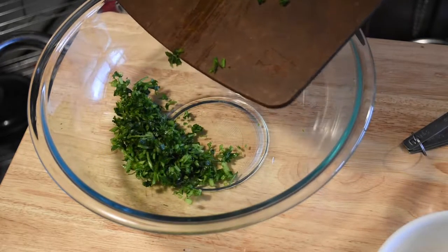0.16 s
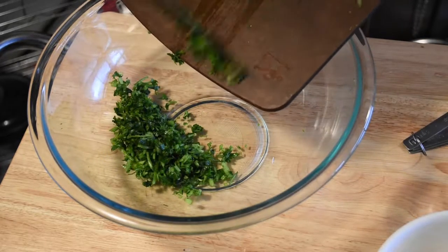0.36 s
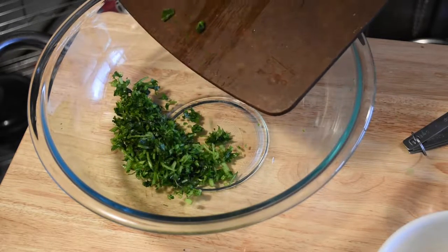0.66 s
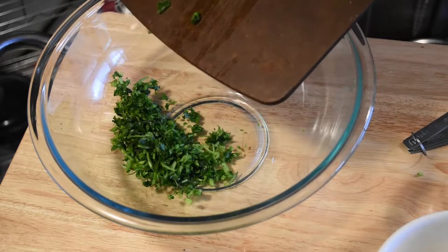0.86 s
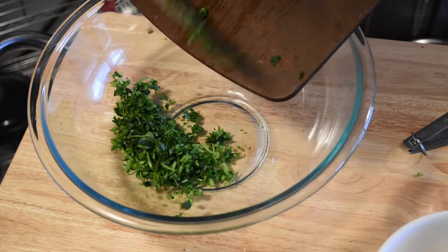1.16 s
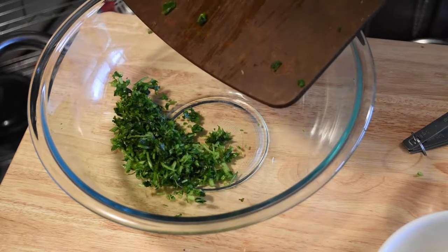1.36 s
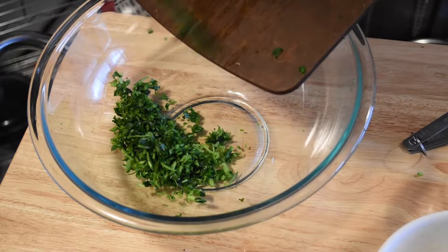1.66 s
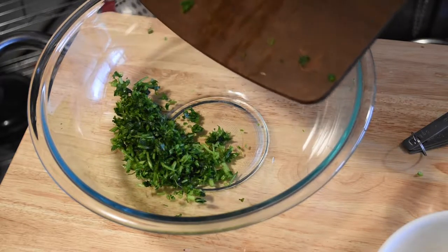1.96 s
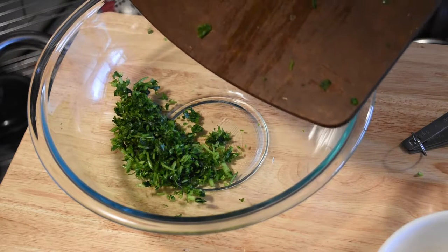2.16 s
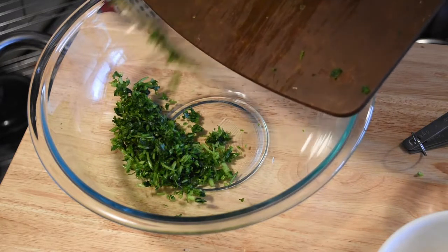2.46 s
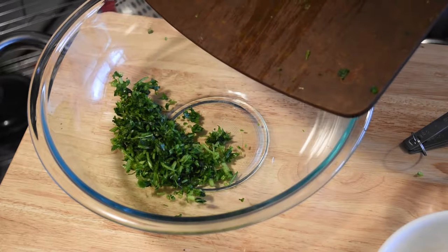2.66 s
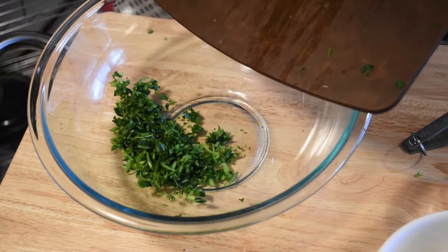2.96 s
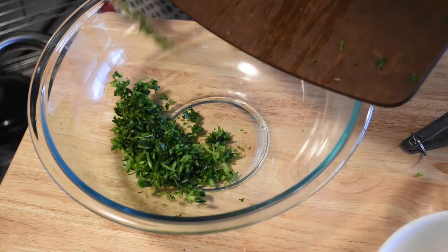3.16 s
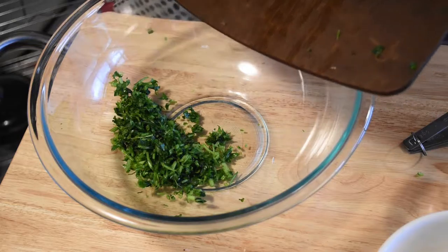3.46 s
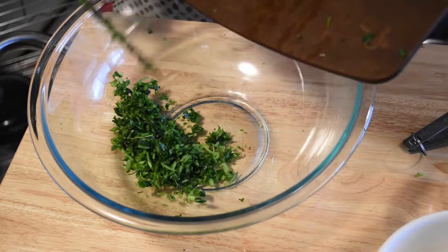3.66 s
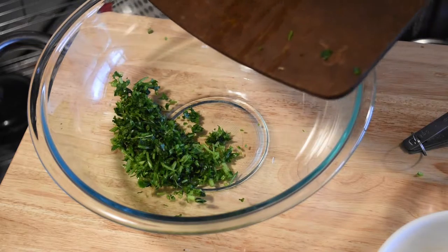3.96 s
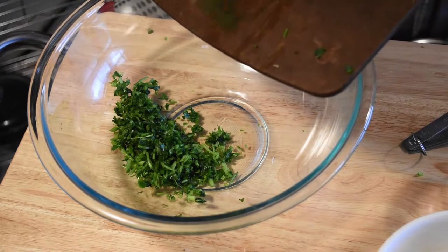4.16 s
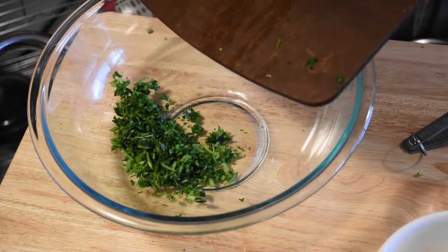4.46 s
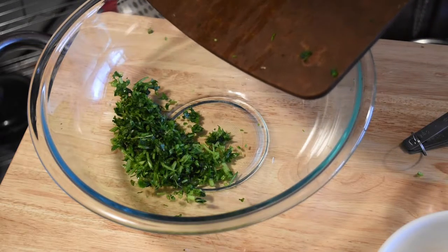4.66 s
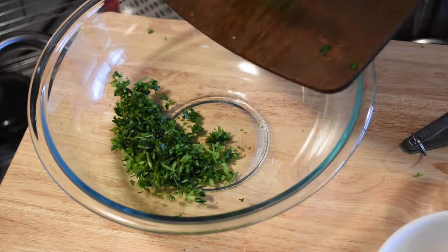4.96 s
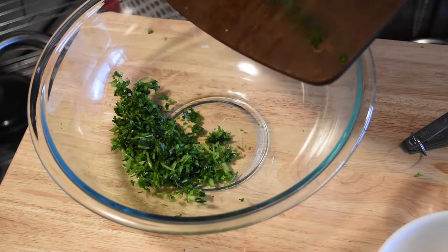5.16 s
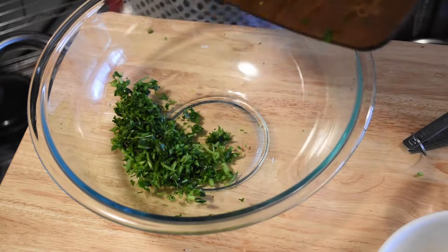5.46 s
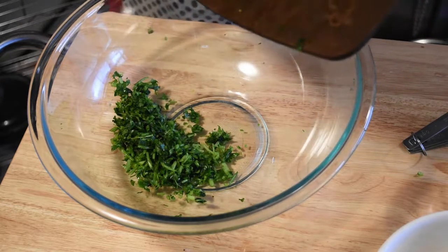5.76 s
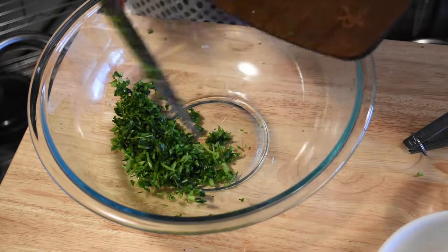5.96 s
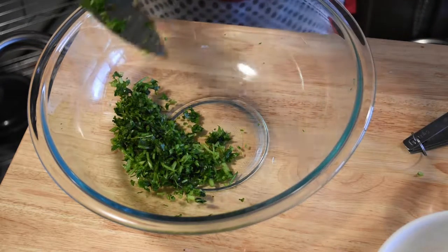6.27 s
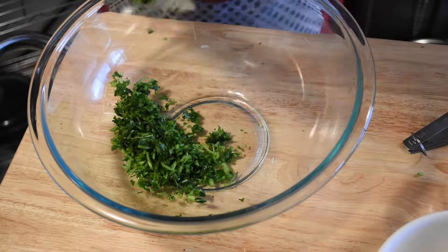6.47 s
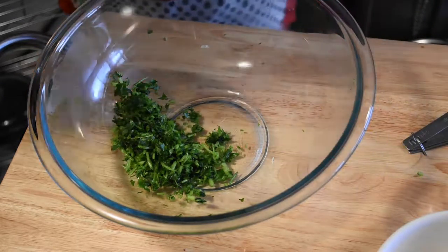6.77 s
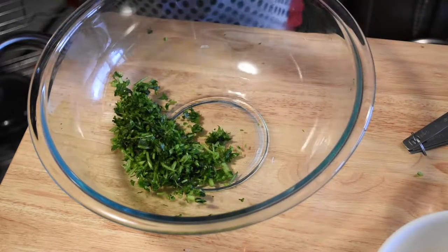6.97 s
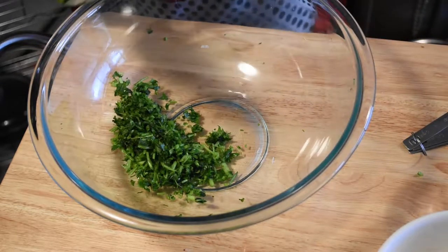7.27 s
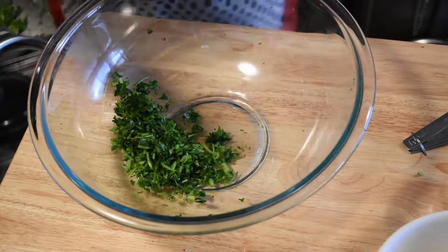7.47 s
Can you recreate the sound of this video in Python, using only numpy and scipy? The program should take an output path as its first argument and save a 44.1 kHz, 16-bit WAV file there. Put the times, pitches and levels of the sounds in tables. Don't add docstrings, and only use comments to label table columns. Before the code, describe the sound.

A small, hard-surfaced kitchen has a constant airy appliance hiss, a thin whistling fan tone and slight hum. At once a hand-held wooden board gives a short creak, and a knife clacks onto it at 0.05 s, followed by light scrapes until 0.4. Strong knocks at 0.67 and 0.83 with a low thud lead into bright double scrapes around 1.0. Another hard clack at 1.5 starts a long swelling drag and a quick rasp to 1.75. Similar knock-and-scrape groups come at 2.27-2.5, 2.9-3.1, a very sharp hit at 3.5, then 4.05-4.25 with a firm thud, 4.57-4.85, 5.17 and a lighter 5.8-5.9. Wood sounds hollow and mid-pitched, steel rings briefly, grit and torn herbs add crisp treble. Small ticks follow at 6.06-6.25 and 7.2-7.4, with faint crackly rustling from 6.6 to the end. Close stereo, short bright reverberation.

```python
import sys
import numpy as np
from scipy import signal
from scipy.fft import rfft, irfft, next_fast_len
from scipy.io import wavfile
from scipy.ndimage import uniform_filter1d

SR = 44100
rng = np.random.default_rng(int(sys.argv[2]) if len(sys.argv) > 2 else 0)


def transcribe(signal):
    frames = np.atleast_2d(signal).T
    limited = np.clip(frames, -1, 1)
    pcm = np.round(limited * 32767).astype(np.int16)
    wavfile.write(sys.argv[1], SR, pcm)


def volts_from_decibels(level):
    exponent = np.asarray(level, float) / 20
    return 10 ** exponent


N = 335601


def band(x, lo_hz, hi_hz, order=2):
    return signal.sosfilt(signal.butter(order, [lo_hz, hi_hz], "bandpass", fs=SR, output="sos"), x)


def shape(x, table):
    hz, db = np.transpose(table)
    size = next_fast_len(x.shape[-1])
    log_f = np.log(np.fft.rfftfreq(size, 1 / SR) + 1)
    gain = volts_from_decibels(np.interp(log_f, np.log(hz), db))
    return irfft(rfft(x, size) * gain, size)[..., :x.shape[-1]]


def unit(x):
    return x / np.sqrt(np.mean(x ** 2))


def walk(rate):
    hold = int(SR / rate)
    steps = np.repeat(rng.standard_normal(N // hold + 1), hold)
    return 2.0 * uniform_filter1d(steps, hold)[:N]


# (frequency [Hz], density [dB per Hz])
AIR = [(15, -43), (25, -15), (335, 0), (416, -2), (575, -5.5), (714, -5.5), (2350, -16.5), (2690, -7),
       (3520, -11), (4030, -17.5), (10100, -24.5), (14800, -31), (16000, -26.5)]
# (low edge [Hz], high edge [Hz], level [dB])
WHISTLE = [
    (2520, 3110, -67),
    (3316, 3580, -62),
    (3590, 3900, -65.5),
    (4325, 4580, -72.5),
    (6200, 6550, -72),
    (340, 460, -66.5),
    (93, 110, -68.5),
]
# (frequency [Hz], level [dB], 12 below its peak)
WHINE = [(15665, -80.5)]


def appliances():
    mid, side = rng.standard_normal((2, N))
    side = shape(side, [(100, -24), (500, -21.5), (1500, -6.5), (4000, -2), (12000, -0.5)])
    pair = np.array([mid + side, mid - side])
    out = volts_from_decibels(-53.5 + 0.7 * walk(3.)) * unit(shape(pair, AIR))
    for lo_hz, hi_hz, db in WHISTLE:
        out += volts_from_decibels(db + 1.5 * walk(5.5)) * unit(band(pair, lo_hz, hi_hz, order=3))
    for hz, db in WHINE:
        out += volts_from_decibels(db + 12.0) * np.sin(2 * np.pi * hz * np.arange(N) / SR)
    return out * volts_from_decibels(np.array([[1.3], [-1.3]]))


def taps(events, cycles):
    out = np.zeros(N)
    for s, db, hz in events:
        turn = np.arange(int(6 * cycles * SR / hz)) * hz / SR
        swing = volts_from_decibels(db) * np.sin(2 * np.pi * turn) * np.exp(-turn / cycles)
        i = int(s * SR)
        out[i:i + len(turn)] += swing[:N - i]
    return out


# (time [s], peak level [dB], frequency [Hz])
GRIP = [
    (0.0011, -31, 395),
    (0.02, -30.5, 350),
    (0.0039, -52, 1565),
]


def grip():
    return taps(GRIP[:2], 5.4) + taps(GRIP[2:], 45.)


# (time [s], board level [dB], knock level re board [dB],
# blade level re board [dB], rattle length [s])
BLOWS = [(0.044, -13, -15, 1, 0.0022), (0.674, -16, -8.5, -0.5, 0.0056), (0.765, -27, -12, -10, 0.0038),
         (0.8349, -14.5, -11, -5, 0.0034), (1.481, -12, -16.5, -13.5, 0.004),
         (2.2664, -14, -48, -4.5, 0.0016), (2.9072, -22, -8, -12, 0.0014), (2.94, -37, -6, -11, 0.0041),
         (3.4959, -9.5, -22.5, -13.5, 0.0025), (4.0525, -20, -18, 11.5, 0.00097),
         (4.206, -21.5, -40, 3, 0.0087), (4.572, -18, -11.5, -12, 0.003), (5.171, -20, -19, 13, 0.0013),
         (5.7755, -28, -30, 19.5, 0.0015), (5.862, -32, -32.5, 11.5, .003), (1.698, -29, -32, 6, .004)]


def blows():
    size = 1500
    force = np.zeros((5, N))
    chatter = rng.standard_normal((len(BLOWS), size))
    for (s, db, knock_db, blade_db, length), noise in zip(BLOWS, chatter):
        i = int(s * SR)
        burst = np.tanh(noise) * np.exp(-np.arange(size) / SR / max(length, 2e-4))
        burst[:2] = -4.5
        burst *= np.sqrt(SR / 100 / np.sum(burst ** 2))
        contact_s = 0.00036 * volts_from_decibels(-0.27 * blade_db)
        push = np.hanning(int(contact_s * SR) + 3)
        soft = np.convolve(burst, push / push.sum())[:size]
        grit_db = -11 + 1.22 * blade_db
        fibres_db = -28 + 0.8 * blade_db
        gains = volts_from_decibels(db + np.array([knock_db, 0, blade_db, grit_db, fibres_db]))
        force[:, i:i + size] += gains[:, None] * np.array([soft, soft, burst, burst, burst])
    return force


# (low edge [Hz], high edge [Hz], level [dB])
CRACK = [
    (163, 840, -2.5),
    (407, 1064, -6.5),
    (1420, 3600, -4.5),
    (3440, 9740, 0.5),
    (8000, 12000, 5.5),
]


def crack(hits):
    out = 0
    for hit, (lo_hz, hi_hz, db) in zip(hits, CRACK):
        out = out + volts_from_decibels(db) * band(hit, lo_hz, hi_hz, order=3) * np.sqrt(SR / 2 / (hi_hz - lo_hz))
    return out


ATTACK_S = 0.0091
LIFT_DB_PER_S = [414, 388, 380, 600]


def gesture(s, length, start_db, rise_db, lift_db_per_s):
    i = max(int(s * SR), 0)
    t = np.arange(min(SR // 2, N - i)) / SR
    length = max(length, 1e-3)
    tilt_db = np.outer(rise_db, np.minimum(t / length, 1))
    fade_db = np.outer(lift_db_per_s, np.maximum(t - length, 0))
    db = np.array(start_db)[:, None] + tilt_db - fade_db
    power = np.zeros((4, N))
    power[:, i:i + len(t)] = (volts_from_decibels(db) * np.minimum(t / ATTACK_S, 1)) ** 2
    return power


# (time [s], board level [dB], blade level re board [dB],
# grit level re board [dB], fade [dB per s])
SETTLES = [(.045, -25, 1.5, -2.5, 167), (0.672, -18, 1, -9.5, 381), (0.761, -31, -3.5, -22, 330),
           (0.835, -17.5, -6, -32.5, 381.5), (1.481, -19, -9.5, -18, 402.5),
           (2.267, -23, 4.5, -10.5, 170.5), (2.908, -27.5, -6, -18, 300), (3.496, -20, 3, -5, 251),
           (4.052, -28, -1, 2.5, 304.5), (4.571, -22, -18, -23.5, 251.5), (5.171, -32, 4, 2.5, 398.5),
           (5.776, -35, 6.5, 7, 399.5)]


def settles():
    power = np.zeros((4, N))
    for s, db, blade, grit, fade in SETTLES:
        parts = np.array([0, blade, grit, grit - 20])
        power += gesture(s, ATTACK_S, db + parts, np.zeros(4), np.full(4, fade))
    return power


# (time [s], length [s], board level [dB], blade level re board [dB], fibres level re board [dB])
PUSHES = [(0.06, 0.022, -27.5, 8, -25), (0.165, 0.038, -24, -7, -7), (.36, 0.044, -32, -1, -9.5),
          (0.961, 0.038, -22.5, 9.5, -1.5), (1.02, 0.094, -24, 10.5, -2), (1.687, 0.059, -23, 11, -2.5),
          (2.306, 0.039, -26.5, -4.5, -13.5), (2.429, 0.085, -21, 7, -7), (2.932, 0.033, -26.5, 3.5, -7),
          (3.062, 0.057, -25, 7, -5.5), (3.529, .03, -24.5, 8.5, -1), (3.584, 0.019, -36.5, 8, 1),
          (4.077, 0.046, -26, 7, -19), (4.187, 0.032, -23.5, 8, -6), (4.231, 0.025, -26, 9.5, -4.5),
          (4.729, 0.071, -23.5, 11.5, -6), (4.807, 0.043, -31.5, 6.5, -4.5), (5.194, 0.051, -26, 4.5, -10),
          (5.228, 0.026, -25, 3.5, -7), (5.805, 0.056, -26, 8.5, -10), (5.85, 0.053, -26.5, 5.5, -4)]
PUSH_RISE_DB = [-4.5, -1.9, 1.5, -3]


def pushes():
    power = np.zeros((4, N))
    rise = np.array(PUSH_RISE_DB)
    for s, length, db, blade, fibres in PUSHES:
        parts = np.array([0, blade, blade - 7, fibres])
        power += gesture(s, length, db + parts - rise / 2, rise, LIFT_DB_PER_S)
    return power


# (time [s], length [s], final board level [dB], blade level re board [dB], swell [dB])
DRAGS = [
    (.11, 0.051, -31.5, -1, -3),
    (.245, 0.15, -33.5, -0.5, 5.5),
    (.893, 0.081, -24, 3, 5),
    (1.545, 0.21, -25.5, -2.5, 8),
    (2.37, .066, -24.5, -5.5, 12),
    (2.985, 0.075, -22.5, -3, 5),
    (4.62, 0.11, -20.5, -0.5, 10),
    (4.134, 0.057, -22.5, -3, 4),
]


def drags():
    power = np.zeros((4, N))
    for s, length, db, blade, swell in DRAGS:
        parts = np.array([0, blade, blade - 7.5, blade - 8])
        power += gesture(s, length, db - swell + parts, np.full(4, swell), LIFT_DB_PER_S)
    return power


def slips(rate, spread_db, flutter_db):
    size = volts_from_decibels(spread_db * np.minimum(rng.exponential(size=N), 3.5))
    happens = rng.random(N) < rate / SR
    jerks = happens * np.tanh(rng.standard_normal(N)) * size
    return unit(jerks * volts_from_decibels(flutter_db * walk(70.)))


def held(table):
    glide_s = 0.011
    s, hz = np.transpose(table)
    now = np.searchsorted(s, np.arange(N) / SR + glide_s / 2, "right") - 1
    return uniform_filter1d(hz[np.maximum(now, 0)], int(glide_s * SR))


def ring(force, modes, wander_db, rate, focus_hz=None, away_db=0.):
    out, power = 0, 0
    for k, (hz, width, db) in enumerate(modes):
        r = np.exp(-np.pi * width / SR)
        poles = [1, -2 * r * np.cos(2 * np.pi * hz / SR), r * r]
        fed_db = db + wander_db * walk(rate)
        if focus_hz is not None:
            octaves = np.log2(hz / focus_hz)
            fed_db += 7.46 * np.exp(-(octaves / 0.06) ** 2) - 1.8
            fed_db -= away_db * (np.minimum(abs(octaves), 1.3) - .6)
        mode = signal.lfilter([1 - r, 0, r * (r - 1)], poles, force * volts_from_decibels(fed_db))
        out = out + (-1) ** k * mode
        power += volts_from_decibels(db) ** 2 * np.pi * width / SR
    return out / np.sqrt(power)


# (frequency [Hz], width [Hz], level [dB])
BOARD_MODES = [(303.8, 35, -15.5), (362, 67, -3.5), (488.6, 25, -1.5), (555, 49, 0), (725, 270, -15),
               (463, 50, -12.5), (826.3, 32, -2.5), (940, 60, 0.5), (997, 100, -0.5), (1260.6, 19, 2.5),
               (820, 1200, -13)]
# (time [s], frequency [Hz])
SPOT = [(0.0, 796), (.06, 520), (.17, 965), (.25, 572), (.83, 820), (.97, 570), (1.03, 720), (1.13, 1000),
        (1.47, 496), (1.54, 400), (1.69, 1002), (1.73, 1260), (2.26, 836), (2.31, 570), (2.465, 875),
        (2.9, 400), (2.93, 1010), (2.99, 575), (3.1, 950), (3.49, 600), (3.57, 840), (4.14, 351),
        (4.18, 578), (4.56, 441), (4.66, 600), (4.8, 903), (5.19, 310), (5.235, 470), (5.77, 1010),
        (5.8, 310)]


def board(force):
    return band(ring(force, BOARD_MODES, 1.5, 22., held(SPOT), away_db=3.0), 267.0, 1900.0, order=3)


# (frequency [Hz], width [Hz], level [dB])
BLADE_MODES = [(1498, 36, -6), (1700.6, 35, -5.5), (1794, 15, -13), (1949, 31, -6), (2143, 66, -6),
               (2361, 44.3, -6.5), (2626, 87, -6), (2717, 97, -7.5), (2999, 37, -2), (3250, 110, -8),
               (3390, 90, -12.5), (2170, 1510, -17.5)]
# (time [s], frequency [Hz])
BITE = [(0.0, 1650), (.67, 2980), (.71, 1980), (.83, 1500), (.9, 2320), (.97, 1722), (1.13, 2430),
        (1.47, 1500), (1.54, 1700), (1.69, 2360), (1.73, 1887), (2.26, 1700), (2.31, 2350), (2.43, 2800),
        (2.465, 1730), (2.9, 1500), (2.99, 2140), (3.09, 1620), (3.49, 1500), (3.52, 2300), (3.57, 1710),
        (4.04, 2430), (4.075, 3020), (4.18, 1950), (4.23, 1550), (4.56, 2370), (4.7, 1725), (5.16, 3200),
        (5.235, 1960), (5.77, 2834)]


def blade(force):
    return band(ring(force, BLADE_MODES, 1.4, 24.813, held(BITE), away_db=3.0), 1100.0, 3300.0)


# (frequency [Hz], width [Hz], level [dB])
GRIT = [(3602, 80, 2), (4016, 144, 1.5), (4510, 350, -2.5), (4944, 180, -1.5), (5300, 390, -4),
        (6000, 1350, -6), (7230, 1020, -5.5), (7780, 290, -5)]
# (frequency [Hz], width [Hz], level [dB])
AIRY = [(8670, 790, 8.5), (9940, 780, 5.5), (10020, 200, 12), (10700, 1300, -0.5), (11940, 110, 7.5),
        (12340, 1400, -7.5), (14570, 1500, -17.5), (13560, 160, -2.5), (15730, 120, -9.5)]


def grit_and_fibres(grit_force, fibres_force):
    top = ring(grit_force, GRIT, 2.1, 40.) + ring(fibres_force, AIRY, 1.66, 40.)
    return band(top, 3000., 15500.)


def knife():
    wood, steel, edge = slips(2500., 1.5, 0.28), slips(4000., 3.8, 0.9), slips(5000., 2.8, 1.1)
    pressure = np.sqrt(settles() + pushes() + drags())
    hits = blows()
    force = pressure * np.array([wood, steel, edge, edge]) + volts_from_decibels(-1.5) * hits[1:]
    return board(force[0]) + blade(force[1]) + grit_and_fibres(force[2], force[3]) + crack(hits)


# (time [s], peak level [dB], frequency [Hz])
THUDS = [
    (0.049, -53, 127),
    (0.099, -40.5, 51.4),
    (0.676, -49, 129),
    (0.719, -31, 51.1),
    (2.269, -60.5, 77),
    (4.049, -28.5, 110.4),
    (5.169, -32.5, 108),
]


def thuds():
    return taps(THUDS, 0.47)


# (time [s], peak level [dB], frequency [Hz])
TICKS = [(.661, -31.5, 10500), (.6667, -38, 10000), (2.1041, -39, 4540), (3.8412, -40, 4490),
         (5.457, -45, 4470), (5.5694, -49, 6500), (5.6735, -42, 6440), (5.7109, -41, 4470),
         (6.0594, -39, 4380), (6.2228, -33.5, 8500), (6.2457, -29, 5260), (6.333, -51, 4550),
         (7.1994, -42, 4240), (7.3994, -43, 6440)]


def ticks():
    return taps(TICKS, 2.4)


# (time [s], level [dB])
RUSTLE = [(6.25, -88.5), (6.45, -79), (6.65, -68), (7.0, -71.5), (7.23, -76.5), (7.4, -65.5), (7.61, -64)]


def rustle():
    s, db = np.transpose(RUSTLE)
    brushing = unit(band(slips(3000., 2.5, 2.9), 6500., 12000.))
    return volts_from_decibels(np.interp(np.arange(N) / SR, s, db)) * brushing


# (low edge [Hz], high edge [Hz], decay time t60 [s], level [dB])
ROOM = [
    (144, 1190, 0.29, -6),
    (1500, 2590, 0.27, -4.5),
    (3300, 7000, 0.28, -2.5),
    (6840, 11600, 0.23, -4.5),
]
# (frequency [Hz], side level re mid [dB])
SIDE = [(60, 0.5), (250, -12), (600, -27), (1200, -14.5), (2400, -13), (4500, -6.5), (12000, -6.5)]


def kitchen(x):
    t = np.arange(SR // 2) / SR
    noise = rng.standard_normal((2, len(t)))
    tail = 0
    for lo_hz, hi_hz, t60, db in ROOM:
        onset = np.sqrt(2 * np.log(1000) / t60 / SR)
        tail = tail + band(noise, lo_hz, hi_hz) * volts_from_decibels(db - 60 * t / t60) * onset
    tail *= np.clip((t - .003) / .0045, 0, 1)
    mid, side = (signal.oaconvolve(x, h)[:N] for h in tail)
    side = shape(side + 0.6 * np.gradient(x), SIDE)
    side += .025 * x
    return np.array([mid + side, mid - side])


def scene():
    near = grip() + knife() + ticks() + rustle()
    return appliances() + near + thuds() + kitchen(near)


def top_cut(x):
    return signal.sosfilt(signal.butter(12, 16340, fs=SR, output="sos"), x)


def record(dry):
    x = signal.sosfilt(signal.butter(1, 30, "highpass", fs=SR, output="sos"), dry)
    x = np.clip(x, -.97, .97)
    x = signal.sosfilt(signal.ellip(8, .2, 60, 15850, fs=SR, output="sos"), x)
    return top_cut(x)


dry = scene()
out = record(dry)
transcribe(out)
```